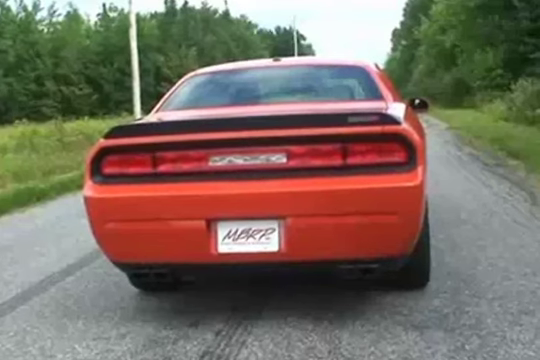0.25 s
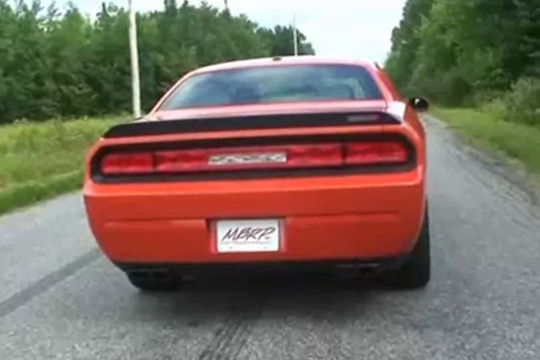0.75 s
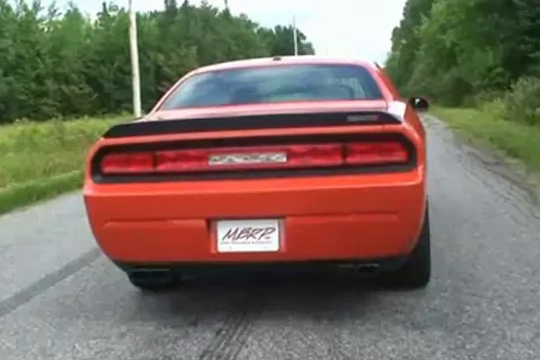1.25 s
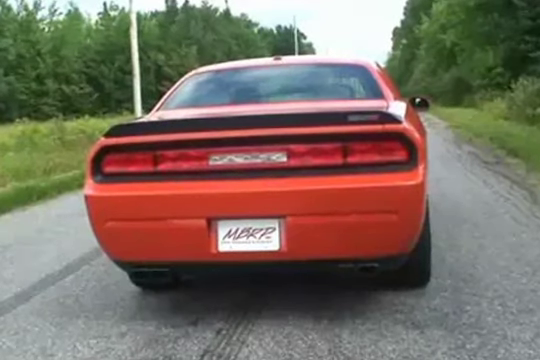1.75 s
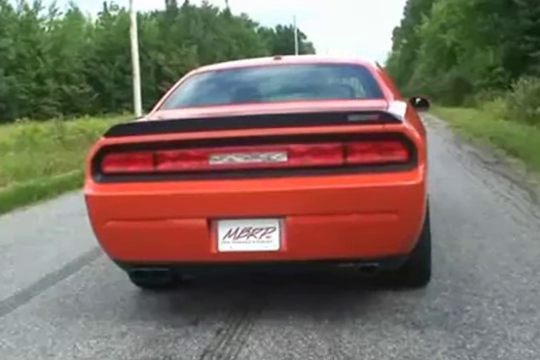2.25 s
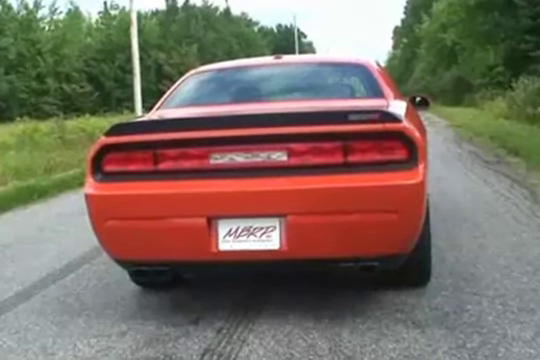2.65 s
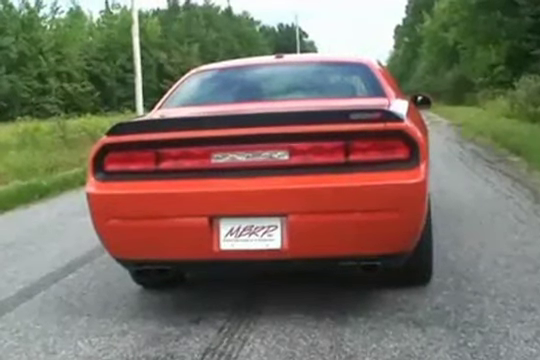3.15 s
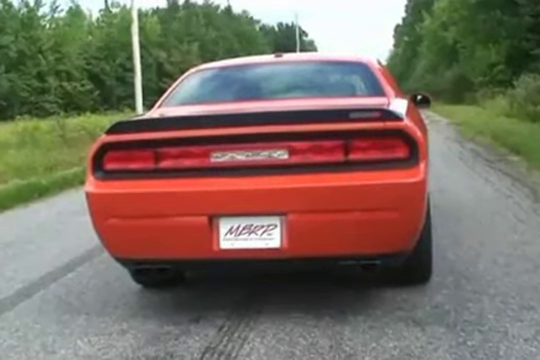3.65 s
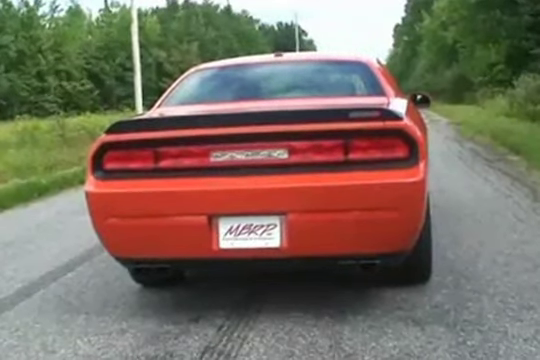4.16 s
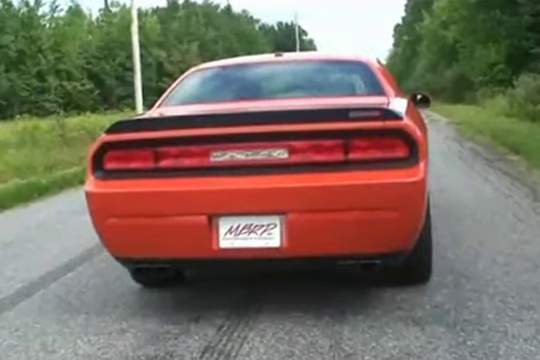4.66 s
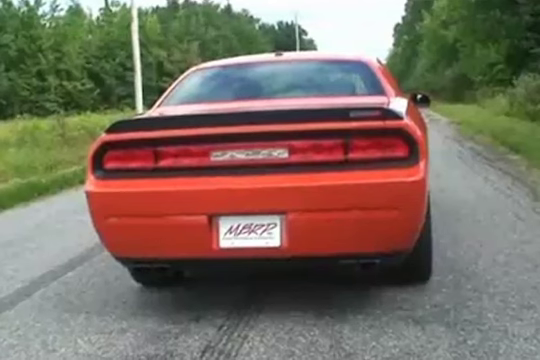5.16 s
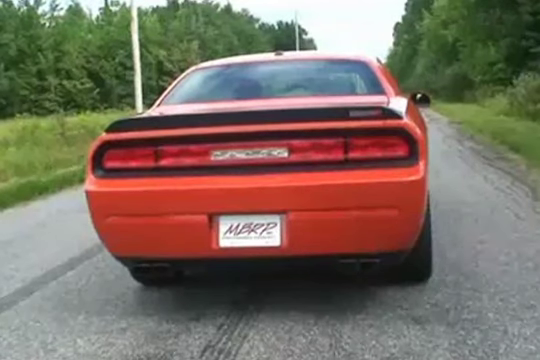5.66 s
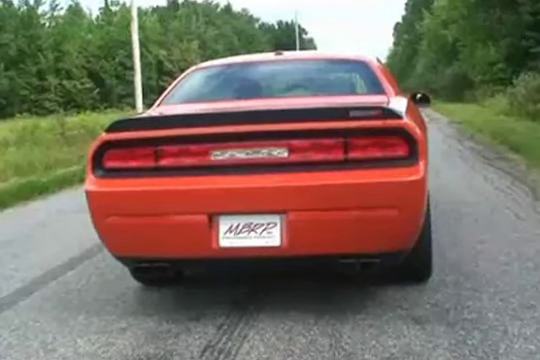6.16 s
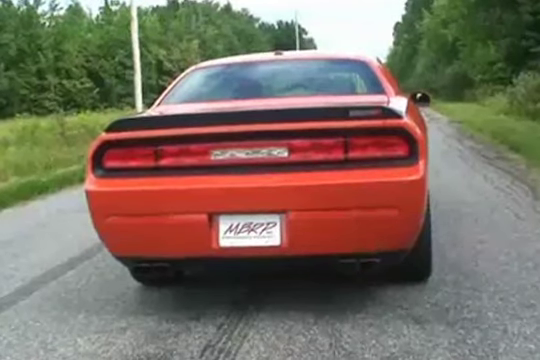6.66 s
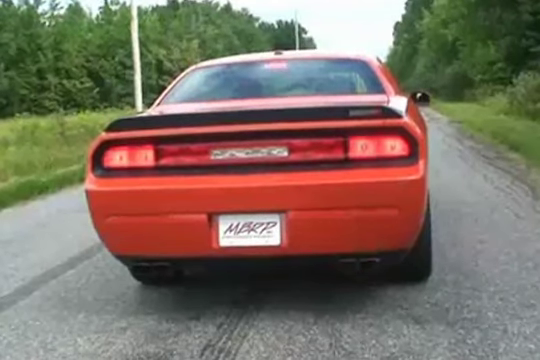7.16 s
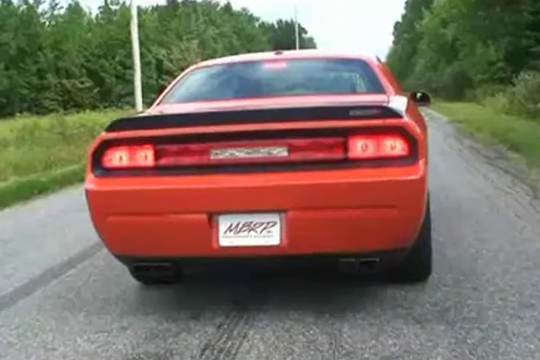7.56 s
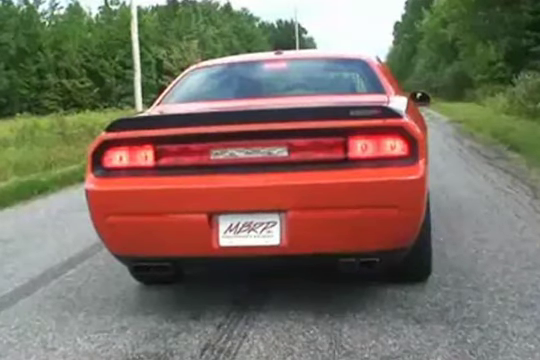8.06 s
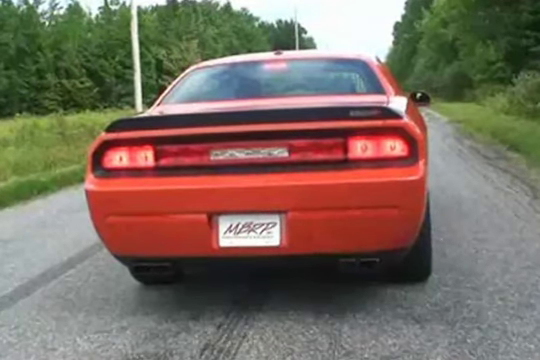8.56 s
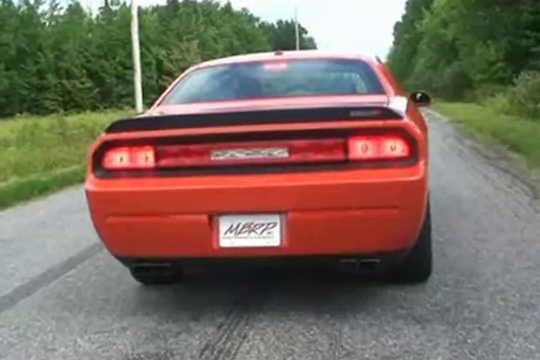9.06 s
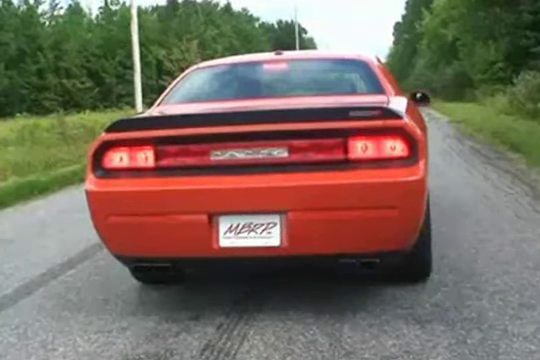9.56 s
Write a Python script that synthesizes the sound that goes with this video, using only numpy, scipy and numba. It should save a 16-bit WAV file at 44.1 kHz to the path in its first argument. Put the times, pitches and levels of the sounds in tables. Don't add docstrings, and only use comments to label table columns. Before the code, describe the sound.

A big eight-cylinder petrol car blips its throttle three times through a loud exhaust, crackling and popping as revs fall, then settles to a lumpy idle.

```python
import sys
import numpy as np
from scipy import signal
from scipy.fft import rfft, irfft
from scipy.io import wavfile
from scipy.ndimage import uniform_filter1d
from numba import njit

SR = 44100
rng = np.random.default_rng(int(sys.argv[2]) if len(sys.argv) > 2 else 0)


def store_pcm(level_fs):
    pcm = np.round(np.clip(level_fs, -1, 1) * 32767).astype(np.int16)
    wavfile.write(sys.argv[1], SR, np.atleast_2d(pcm).T)


def makeup_ratio(level_db):
    decades = np.asarray(level_db, float) / 20
    return 10 ** decades


N = 432180
RUSH_DB = -42


def smooth(x, seconds):
    length = int(seconds * SR)
    return uniform_filter1d(uniform_filter1d(x, length), length)


def even(x, seconds):
    return x / np.sqrt(smooth(x ** 2, seconds) + 1e-12)


def curve(at, table):
    places, *columns = np.transpose(table)
    return np.squeeze([np.interp(at, places, column) for column in columns])


def tent(t, at, half):
    return np.clip(1 - np.abs(t - at) / half, 0, 1)


def colour(x, table):
    hz, db = np.transpose(table)
    bins = np.maximum(np.fft.rfftfreq(len(x), 1 / SR), 1)
    gain = makeup_ratio(np.interp(np.log(bins), np.log(hz), db, left=-80, right=-80))
    y = irfft(rfft(x) * gain, len(x))
    return y / y.std()


@njit
def svf(x, hz, width):
    y, band, low, g, k = np.empty(len(x)), 0., 0., 0., 0.
    for i in range(len(x)):
        if i == 0 or hz[i] != hz[i - 1]:
            g, k = np.tan(np.pi * hz[i] / SR), width[i] / hz[i]
        v = (band + g * (x[i] - low)) / (1 + g * (g + k))
        band, low, y[i] = 2 * v - band, low + 2 * g * v, k * v
    return y


def ring(x, modes):
    total = 0
    for k, (hz, width, db) in enumerate(modes):
        total = total + (-1) ** k * makeup_ratio(db) * svf(x, np.full(N, 1. * hz), np.full(N, 1. * width))
    return total


def spread(x, chambers):
    for hz, width in chambers:
        x = x - 2 * ring(x, [(hz, width, 0)])
    return x


def clicks(seconds, size):
    at = np.clip(seconds * SR, 0, N - 2)
    whole = at.astype(int)
    part = at - whole
    return np.bincount(whole, size * (1 - part), N) + np.bincount(whole + 1, size * part, N)


def puff(x, rise_s, fall_s):
    t = np.arange(int(.06 * SR)) / SR
    shape = 2 * (1 - np.exp(-t / rise_s)) ** 2 * np.exp(-t / fall_s)
    return signal.fftconvolve(x, shape)[:N]


def flutter(smooth_s, level_s):
    steps = np.repeat(rng.standard_normal(N // 2000 + 1), 2000)[:N]
    return even(smooth(steps, smooth_s), level_s)


def controls(t):
    # time in seconds, firing rate in Hz.
    revs = [(0, 96.9), (.34, 117.1), (.74, 84.6), (.97, 65.8), (1.2, 73.9), (1.32, 90.23), (1.68, 137.1),
            (1.93, 157), (2.8, 89.35), (2.9, 98.15), (3.23, 260.2), (3.42, 250.6), (3.76, 216.6),
            (4.08, 192.5), (4.5, 152.7), (5.36, 87.04), (5.9, 83.1), (6.2, 59.57)]
    # time in seconds, cylinder filling in dB.
    filling = [(0, 1), (.2, 1), (.5, -3), (.8, -1), (.92, -8), (1.06, -6.5), (1.2, 2.5), (1.55, 1),
               (2.2, 2), (2.78, -6.5), (2.9, 3), (3.24, -0.5), (3.5, -2.5), (4.4, 1.5), (5.1, -6),
               (5.5, -9), (6.2, -10.5)]
    # time in seconds, firing rate in Hz, filling in dB.
    idling = [(6.56, 52.6, -6), (7.05, 52.62, 0), (7.7, 49.23, 1), (7.98, 50.44, 3), (8.26, 47.22, 1.5),
              (8.54, 53.4, 6), (8.8, 52.8, 5.5), (9.62, 49.66, 4), (9.8, 48.9, 5)]
    # time in seconds, half length in seconds, filling change in dB.
    cuts = [
        (0.71, 0.014, -1),
        (0.81, 0.052, 2),
        (0.819, 0.0086, -7),
        (2.825, 0.033, -3.5),
        (3.305, 0.048, -5.5),
    ]
    # firing rate in Hz, then levels of note, throb, bark and gas in dB.
    levels = [(50.3, -39, -27, -42.5, -45), (64.4, -24, -18.5, -21.5, -44), (82.8, -27, -21, -21.5, -44.5),
              (96.5, -15.5, -12, -16.5, -40), (105.5, -11.5, -23, -16, -41), (155, -12.5, -22, -16, -39.5),
              (152.3, -11.5, -18.5, -16, -37), (175, -16, -18.5, -13.5, -38.5), (202, -13.5, -20, -15, -39),
              (257, -14, -15, -12.5, -35.5)]
    follow = [0.88, 1.14, 1.19, 0.16]
    # time in seconds, half length in seconds, extra throb in dB, extra gas in dB.
    burbles = [
        (0.672, 1, 3, 4),
        (6.135, 0.11, 11.5, 7),
    ]
    # time and half length in seconds, then change of note, bark and gas in dB.
    rasps = [
        (0.877, 0.098, -10, 0, -2),
        (1.957, 0.21, -3, -1, 3.5),
        (2.251, 0.33, -2.5, -2.5, 6.5),
        (3.106, 0.083, -2, 1.5, 8.5),
        (4.376, 0.68, -2.5, -1, 6.5),
        (6.135, 0.0826, 5, 4, -2),
    ]
    # firing rate in Hz, random scatter of the firings in dB.
    scatter_law = [(55, .3), (85, .8), (150, 1), (200, 1.8)]

    hz = smooth(curve(t, revs + [row[:2] for row in idling]), .07)
    load_db = curve(t, filling + [row[::2] for row in idling])
    load_db = load_db + sum(db * tent(t, at, half) for at, half, db in cuts)
    layers_db = curve(hz, levels) + np.outer(follow, load_db)
    burble = 0
    for at, half, throb_db, gas_db in burbles:
        swell = tent(t, at, half)
        layers_db = layers_db + np.outer([0, throb_db, 0, gas_db], swell)
        burble = burble + swell
    for at, half, note_db, bark_db, gas_db in rasps:
        layers_db = layers_db + np.outer([note_db, 0, bark_db, gas_db], tent(t, at, half))
    scatter_db = curve(hz, scatter_law) + 2.2 * burble
    return hz, layers_db, scatter_db, load_db


def firings(hz, scatter_db, jitter_s=.00009):
    # strength in dB, lateness in ms.
    idle = [(-.4, -1.33), (-1.5, -.19), (-.7, 1.31), (1.1, -1.2), (-.5, 0), (-1.3, .44), (1.8, .83),
            (1.6, .13)]
    revved = [(-3, 1.8), (-4, -0.44), (-5.5, 3.5), (-4.5, -0.5), (-3.5, 1.04), (-6, 1.92), (-12, 3.5),
              (-8.5, 1.32)]
    racing = [(.7, .64), (-9.4, -.3), (2.8, .39), (3.5, .11), (-3.9, -.43), (1.7, -.34), (.4, .61),
              (4.2, -.69)]
    pattern_hz = [53, 135, 215]
    # firing rate in Hz, place between the patterns (0 idle, 1 revved, 2 racing).
    blend = [(74, 0.11), (96, 0.744), (172, 0.74), (200, 2)]
    # firing rate in Hz, slow wander of each cylinder's filling in dB.
    drift_law = [(55, .15), (90, .8), (150, 1.1), (200, 2.6)]

    fired = np.cumsum(hz) / SR
    count = np.arange(int(fired[-1]))
    times = np.interp(count, fired, np.arange(N) / SR)
    index = (times * SR).astype(int)
    rate = hz[index]
    patterns = np.array([idle, revved, racing])[:, (count - 1) % 8]
    place = np.interp(rate, *np.transpose(blend))
    share = np.clip(1 - np.abs(place - np.arange(3)[:, None]), 0, 1)
    db = (share * patterns[..., 0]).sum(axis=0)
    late_s = (share * patterns[..., 1] * np.array(pattern_hz)[:, None]).sum(axis=0) / rate / 1000
    chance = rng.standard_normal((N // 200, 3))[count].T
    rough = scatter_db[index]
    wander = 2 * uniform_filter1d(rng.standard_normal((N // 1600, 8)), size=4, axis=0).ravel()[count]
    db = db + curve(rate, drift_law) * wander
    fire_s = times + late_s + jitter_s * rough * chance[0]
    return fire_s, makeup_ratio(db + rough * chance[1]), chance[2], fired, times


def pipes(times, sizes, chance, steady_times, hz, note_db, throb_db, bark_db, gas_db):
    # frequency in Hz, level in dB.
    pipe_shape = [(25, -44.5), (60, -18), (92, -5), (108, 3.5), (128, -2.5), (148, 5), (172, -2), (200, -9),
                  (228, -16), (270, -4), (400, -49.5)]
    silencer_shape = [(150, -8), (205, 1), (240, 6), (300, 1.5), (350, -7), (414, -6.5), (480, -15.5),
                      (641, -17), (769, -31.5), (941, -52), (1400, -36)]
    rumble_shape = [(20, -32.5), (35, -9), (70, 10), (110, -33.5)]
    # firing rate in Hz, how far the banks cancel each other's low lumps (0 to 1).
    balance_law = [(55, .9), (70, 0)]
    # firing rate in Hz, share of the uneven part in the throb.
    lump_law = [(50, 1), (62, .6), (85, .9), (150, 1.01), (250, 1.01)]
    # firing rate in Hz, amount of swirling noise between pulses.
    swirl_law = [(55, .08), (90, .18), (150, .2), (200, .32)]

    pulses = clicks(times, sizes)
    steady = clicks(steady_times, uniform_filter1d(sizes, size=16))
    uneven, balanced, lump = pulses - steady, curve(hz, balance_law), curve(hz, lump_law)
    note = svf(svf(pulses - balanced * uneven, hz, hz / 8), hz, hz / 8)
    uneven = uneven - .4 * balanced * svf(uneven, 2 * hz, hz / 3)
    lumpy = steady + lump * uneven
    throb = colour(lumpy - svf(lumpy, hz, hz / 6), pipe_shape)
    throb = spread(throb, [(146, 52.4), (240, 48.6)])
    late = clicks(times + 0.00014 * chance, sizes)
    late = steady + lump * (late - steady)
    late = late + curve(hz, swirl_law) * np.sqrt(hz / SR) * rng.standard_normal(N)
    steepness = 5.9 * (hz / 230) ** 2 * makeup_ratio(3.8 * (bark_db + 10.0))
    late = late + steepness * ring(late, [(620, 340, 0.21), (1110, 160, -1)])
    bark = colour(late - svf(late, hz, hz / 6), silencer_shape)
    bark = spread(bark, [(146, 47.0), (240, 52.0), (282, 71), (420, 69), (600, 195)])
    rumble_db = -36.5 + 2.5 * np.minimum(gas_db + 40.5, 0)
    rumble = makeup_ratio(rumble_db) * colour(rng.standard_normal(N), rumble_shape)
    note, throb, bark = even(note, 0.064), even(throb, 0.37), even(bark, 0.2)
    return makeup_ratio(note_db) * note + makeup_ratio(throb_db) * throb + rumble + makeup_ratio(bark_db) * bark


def overtones(fired, hz, load_db):
    orders = [1.25, 1.625, 1.75, 2, 2.75]
    # firing rate in Hz, then the level of each multiple in dB.
    strengths = [(49.6, -49, -67, -60, -32.5, -33.5), (69, -40, -42, -46, -28, -40),
                 (96, -33, -22, -28.5, -23, -35), (150, -28, -28, -28.5, -40, -30),
                 (210, -30, -23.5, -32.5, -41, -39.5), (255, -32, -31, -29, -34, -49)]
    total = 0
    for order, db in zip(orders, curve(hz, strengths)):
        waver = makeup_ratio(4 * flutter(.025, 3.))
        total = total + makeup_ratio(db + load_db) * waver * np.cos(2 * np.pi * order * fired)
    return total


def jet():
    # frequency in Hz, level in dB per Hz.
    gas_shape = [(410, -40.5), (700, -5.5), (946, -11.5), (1040, -7.5), (1160, -10.5), (1900, -11),
                 (2150, -16.5), (2340, -14), (2700, -16), (4760, -19.5), (6760, -22.5), (11500, -33.5),
                 (12500, -52), (16200, -86), (22000, -120)]
    # frequency in Hz, width in Hz, level over the jet in dB.
    tips = [(876, 18, 6.5), (990, 7.3, 6.5), (1470, 8.4, 7.5), (1430, 30, -7), (1920, 530, -6),
            (3340, 50, -39), (4930, 640, -9)]
    noise = rng.standard_normal(N)
    return colour(noise + 1.02 * ring(noise, tips), gas_shape)


def gas(fired, hz, gas_db):
    t = np.arange(N) / SR
    first = np.interp(np.arange(1, fired[-1], 4), fired, t)
    second = np.interp(np.arange(2.37, fired[-1], 4), fired, t)
    chance = makeup_ratio(2.2 * rng.standard_normal((N // 800, 2)).T)
    weak = makeup_ratio(np.interp(np.interp(second, t, hz), [55, 110], [-1.5, -11]))
    beats = clicks(first, chance[0, :len(first)]) + clicks(second, weak * chance[1, :len(second)])
    gate = even(puff(beats, .006, .005), .15) + .9
    power = np.maximum(makeup_ratio(2 * gas_db) - makeup_ratio(2 * (RUSH_DB - 15.0)), 0)
    flow = jet()
    rasp = ring(flow, [(1800, 1000, 0.006)])
    rest = flow - rasp
    return np.sqrt(power) * even(gate * rasp + (0.27 * gate + 1.0) * rest, 0.44)


def rush():
    # frequency in Hz, level in dB per Hz.
    rush_shape = [(260, -0.5), (450, -0.5), (656, -1.5), (970, -19), (1920, -11.5), (2510, -25),
                  (4030, -35), (4970, -49.5), (9070, -28.5), (10300, -43), (11700, -33), (12200, -36.5),
                  (12700, -64), (16500, -100), (22000, -120)]
    noise = rng.standard_normal(N)
    bands = 0
    for hz in 368.0 * 2 ** np.arange(6):
        flicker = makeup_ratio(2.8 * flutter(0.013, 3.3))
        bands = bands + flicker ** min(hz / 1600, 1) * svf(noise, np.full(N, hz), np.full(N, 0.5 * hz))
    return makeup_ratio(RUSH_DB) * colour(bands, rush_shape)


def knocks():
    # time in seconds, peak level in dB, ring in Hz.
    pushes = [(0.048, -24.5, 640), (0.564, -27, 681), (0.616, -30, 614), (0.659, -48, 565),
              (0.743, -24, 517), (1.697, -18, 608), (1.866, -17, 538), (2.11, -22, 543),
              (2.168, -20.5, 656), (2.452, -23, 650), (2.596, -28.5, 495.3), (2.871, -17, 501),
              (3.846, -17, 610), (3.884, -20, 608), (4.004, -19.5, 590), (4.087, -26.5, 554),
              (4.621, -21, 552), (4.676, -23.5, 650), (4.736, -24, 637), (4.857, -25, 608),
              (4.956, -31, 534), (5.216, -40, 551.4)]
    rise_s, fall_s = .0015, 0.0091
    t = np.arange(2000) / SR
    shape = 2 * (1 - np.exp(-t / rise_s)) * np.exp(-t / fall_s)
    out = np.zeros(N)
    for at, db, hz in pushes:
        start = int(at * SR)
        out[start:start + 2000] += makeup_ratio(db - 4) * shape * np.sin(2 * np.pi * hz * t)
    return out


def pops():
    # time in seconds, peak level in dB, ring in Hz.
    pop_events = [(0.4574, -20.5, 1790), (0.4833, -23, 1770), (0.5224, -22, 1890), (0.648, -18.5, 1827),
                  (0.6958, -16, 1750), (0.745, -15.5, 1970), (1.8697, -24, 1800), (1.896, -19.5, 1707),
                  (1.923, -19.5, 1820), (1.948, -20, 1870), (1.9774, -18, 1490), (1.9994, -25, 1660),
                  (2.0268, -30, 1880), (2.054, -30.5, 1908), (2.1103, -27, 1680), (2.166, -17, 1950),
                  (2.2233, -19, 1890), (2.2877, -21.5, 1950), (2.3497, -25, 1900), (2.382, -43, 1800),
                  (2.453, -26.5, 1526), (2.4862, -29, 1867), (2.5608, -27, 1460), (2.9004, -18, 1290),
                  (2.9384, -20.5, 1700), (2.971, -36, 1660), (2.9993, -21.5, 2000), (3.025, -25, 1730),
                  (3.05, -19.5, 1870), (3.0783, -17.5, 1430), (3.099, -14, 1490), (3.1454, -16, 2020),
                  (3.2896, -29, 1800), (3.31, -25.5, 1720), (4.0664, -22.5, 1608), (4.13, -26, 1466),
                  (4.178, -22, 1930), (4.219, -19, 1880), (4.2623, -22.5, 1900), (4.2834, -18.5, 1390),
                  (4.3106, -20, 1700), (4.3331, -18.5, 1750), (4.3574, -27, 1726), (4.4074, -32, 1310),
                  (4.433, -12.5, 1740), (4.4602, -17, 1970), (4.4836, -20, 1810), (4.5111, -20, 1950),
                  (4.593, -25, 1850), (4.6204, -21.5, 1680), (4.797, -24, 1340), (4.8294, -28, 1583),
                  (4.8586, -24.5, 1464), (5.138, -41, 1710), (5.218, -23, 1800), (5.2593, -25.5, 1860),
                  (6.073, -26, 1885), (6.1355, -22.5, 1950),
                  (0.5463, -28, 1860), (0.5874, -39, 1659), (0.616, -35, 1870), (0.7173, -32, 1940),
                  (0.7298, -26, 1920), (0.758, -29, 1600), (2.7576, -28, 1877), (3.1207, -30, 1535),
                  (3.174, -35, 1350), (3.2144, -27, 1380), (3.4007, -30, 1330), (4.196, -21, 1654),
                  (4.2413, -15.5, 1830), (4.385, -24, 1930), (4.539, -26, 1857), (4.677, -31, 1840),
                  (4.7331, -31, 1400), (4.9564, -39, 1940), (6.0994, -27, 1870), (6.2344, -41, 1512),
                  (6.2698, -28, 1707)]
    s, db, ring_hz = np.transpose(sorted(pop_events))
    hits = clicks(s - 0.0026, makeup_ratio(db + 6))
    latest = np.searchsorted(s - .008, np.arange(N) / SR) - 1
    centre = ring_hz[np.clip(latest, 0, None)]
    push, flow = puff(hits, 0.00025, 0.00075), jet()
    knock = ring(push, [(620, 290, -8)]) + makeup_ratio(-9.0) * svf(push, centre, .3 * centre)
    rasp = makeup_ratio(5.0) * svf(flow, centre, 0.19 * centre)
    rasp = rasp + ring(flow, [(1220, 270, -5.5), (3520, 400, -0.5), (4840, 1100, -2.0), (8650, 3300, -1.5)])
    return makeup_ratio(-1.0) * puff(hits, 0.0029, 0.0026) * rasp + makeup_ratio(-5) * knock


def thuds():
    # time in seconds, peak level in dB, pitch in Hz.
    bangs = [
        (.8, -9, 150),
        (1.27, -18, 170),
        (3.4, -18, 110),
        (3.438, -11, 110.2),
        (6.103, -26, 150),
        (6.233, -17, 127.8),
        (6.27, -34.5, 584),
    ]
    t = np.arange(N) / SR
    return sum(makeup_ratio(db) * np.sin(2 * np.pi * hz * (t - at)) * tent(t, at, 0.014) ** 2 for at, db, hz in bangs)


def blast(fired):
    # starts, full, holds until, gone [s].
    blast_s = [2.85, 2.89, 3.24, 3.3]
    t = np.arange(N) / SR
    howl = ring(rng.standard_normal(N), [(550, 110, 6.5), (1110, 96, 5.0), (1350, 150, -0.5), (1950, 740, -3.5)])
    bursts = 0.51 + np.cos(np.pi * fired / 4) ** 4
    return makeup_ratio(-29) * np.interp(t, blast_s, [0.13, 0.6, 0.63, 0]) * bursts * howl / howl.std()


def belt(fired):
    # starts, full, holds until, gone [s].
    hang_s = [5.2, 5.4, 5.95, 6.2]
    quiet_db, hang_db = -63, -35.5
    hum = np.sin(2 * np.pi * 15 / 4 * fired)
    hiss = even(ring(rng.standard_normal(N), [(839, 8.6, -21.5), (1608, 24, -24.5)]), .5)
    level_db = np.interp(np.arange(N) / SR, hang_s, [quiet_db, hang_db, hang_db, quiet_db])
    return makeup_ratio(level_db) * (hum + makeup_ratio(-14.5) * hiss)


def side_hiss(gas_db):
    # frequency in Hz, level in dB.
    hiss_shape = [(25, -9), (200, -22), (600, 12.5), (1300, -5), (2400, -14.5), (5000, -14.5), (8000, -11),
                  (10500, -7.5), (11500, -32.5)]
    hiss = makeup_ratio(-68.5 + .6 * (gas_db + 52.5)) * colour(rng.standard_normal(N), hiss_shape)
    return hiss + makeup_ratio(gas_db - 26) * ring(jet(), [(1500, 2500, 0)])


def scene():
    # time in seconds, half length in seconds, change in dB.
    lulls = [
        (1.003, 0.35, -2),
        (2.833, 0.04, -4),
        (3.255, 0.064, -10),
        (5.73, 0.57, -2.5),
    ]
    balance_db, side_lag_s = -1.86, .00003
    t = np.arange(N) / SR
    hz, (note_db, throb_db, bark_db, gas_db), scatter_db, load_db = controls(t)
    times, sizes, chance, fired, steady_times = firings(hz, scatter_db)
    low = -pipes(times, sizes, chance, steady_times, hz, note_db, throb_db, bark_db, gas_db)
    low = low + overtones(fired, hz, load_db) + thuds() + knocks()
    lull = makeup_ratio(sum(db * tent(t, at, half) for at, half, db in lulls))
    high = lull * (gas(fired, hz, gas_db) + rush()) + pops() + belt(fired) + blast(fired)
    left = np.interp(t + side_lag_s, t, low) * makeup_ratio(balance_db / 2) + high * makeup_ratio(-2.5)
    right = low * makeup_ratio(-balance_db / 2) + high * makeup_ratio(-2.47)
    side = side_hiss(gas_db)
    return np.array([left + side, right - side])


def low_pass(x):
    return signal.sosfilt(signal.butter(12, 12850, fs=SR, output="sos"), x)


def record(dry):
    ends = np.clip(np.minimum(np.arange(N), np.arange(N)[::-1]) / 100, 0, 1)
    return low_pass(ends * np.tanh(1.134 * dry) / 1.059)


dry = scene()
out = record(dry)
store_pcm(out)
```